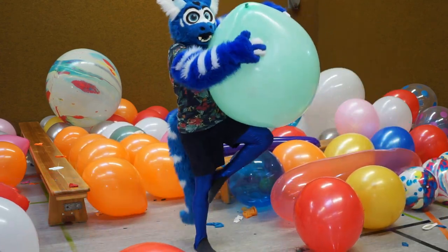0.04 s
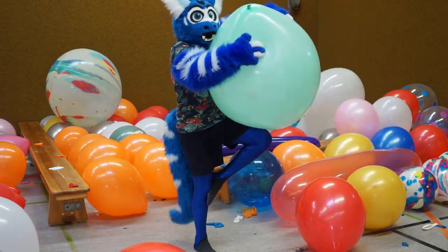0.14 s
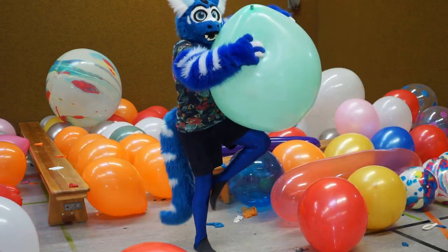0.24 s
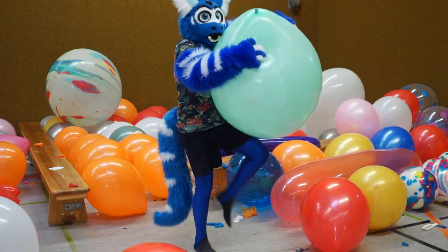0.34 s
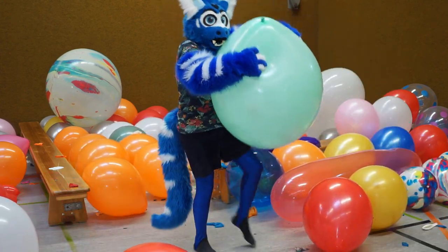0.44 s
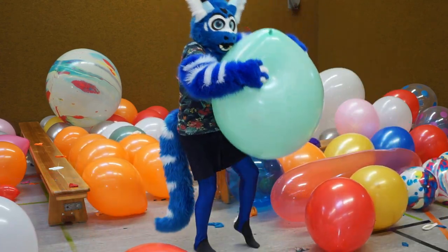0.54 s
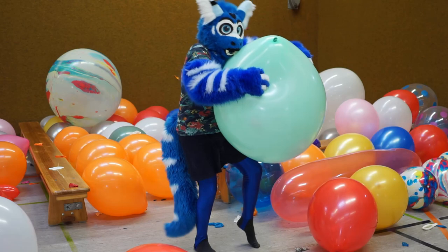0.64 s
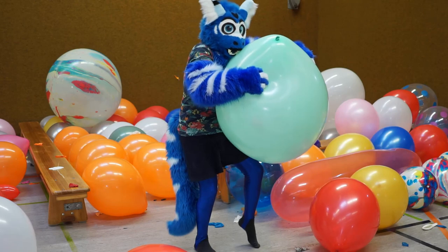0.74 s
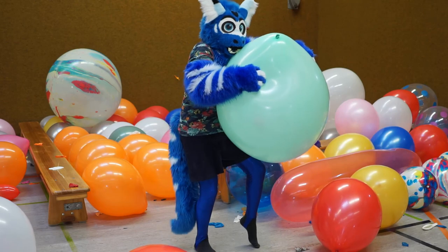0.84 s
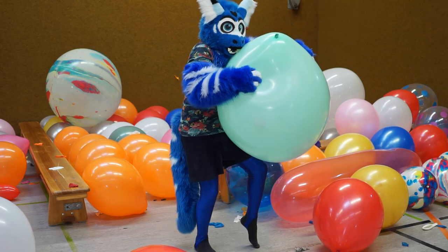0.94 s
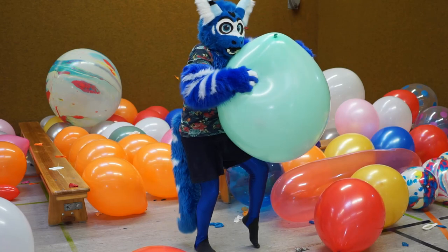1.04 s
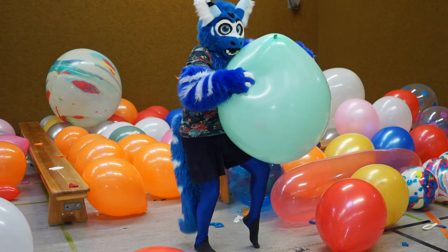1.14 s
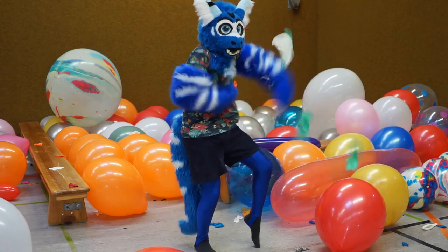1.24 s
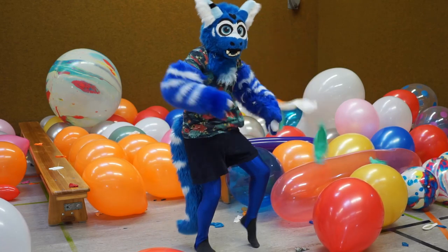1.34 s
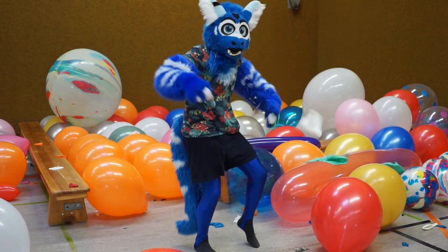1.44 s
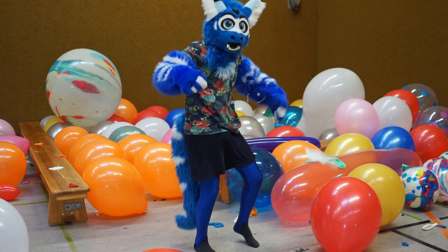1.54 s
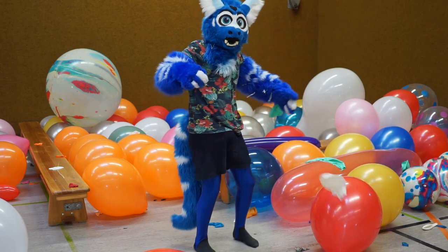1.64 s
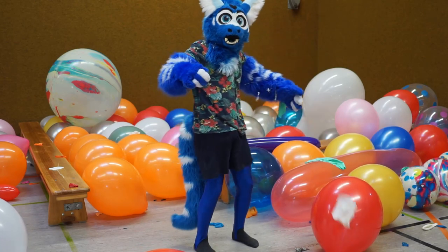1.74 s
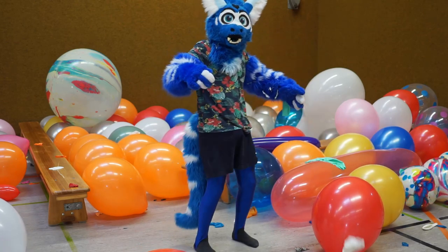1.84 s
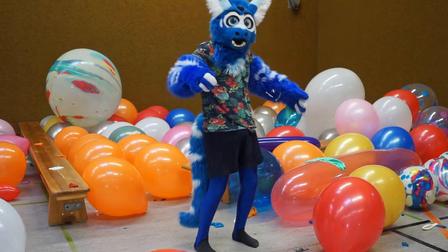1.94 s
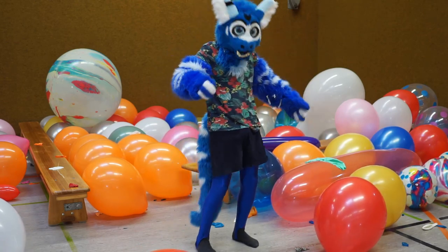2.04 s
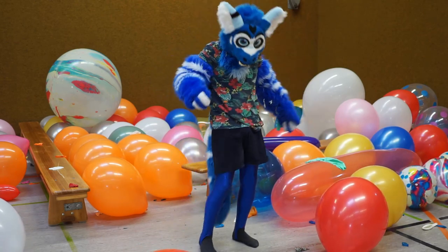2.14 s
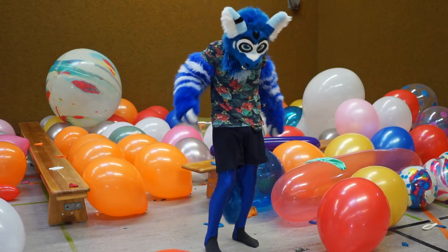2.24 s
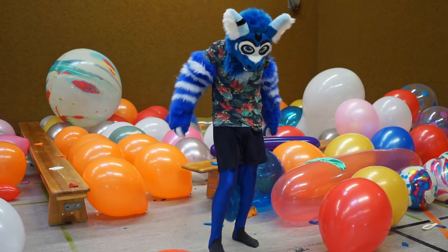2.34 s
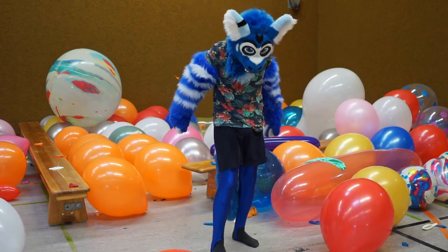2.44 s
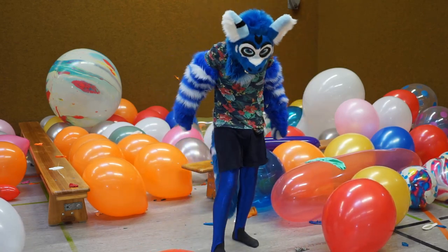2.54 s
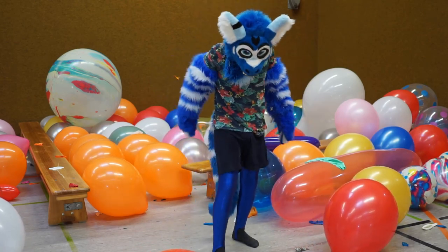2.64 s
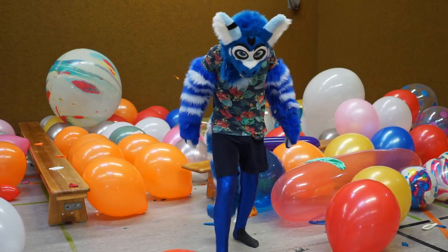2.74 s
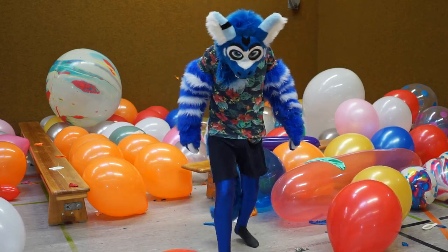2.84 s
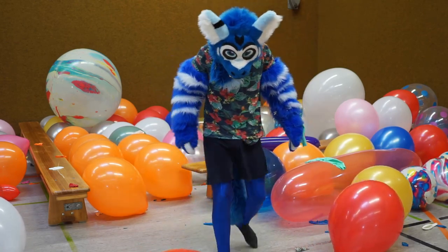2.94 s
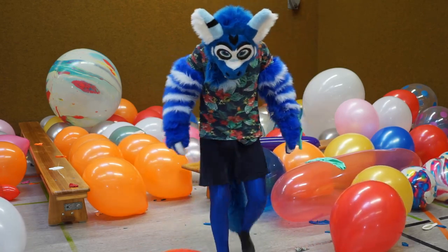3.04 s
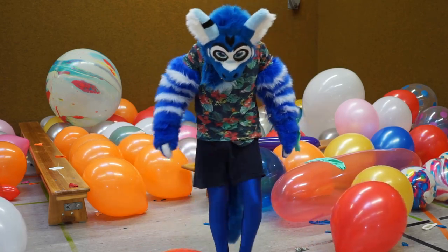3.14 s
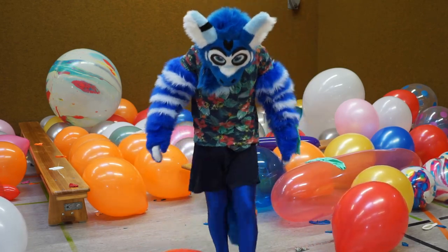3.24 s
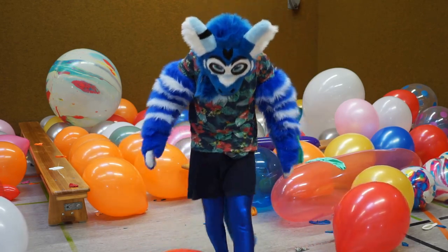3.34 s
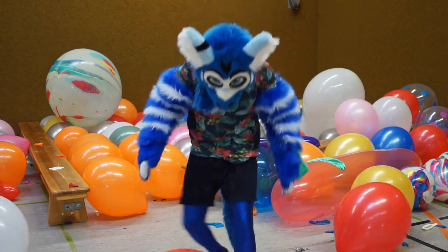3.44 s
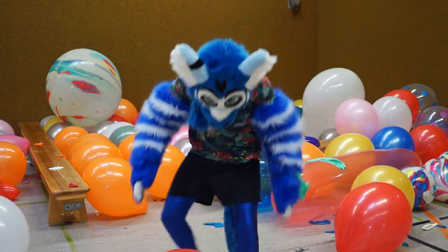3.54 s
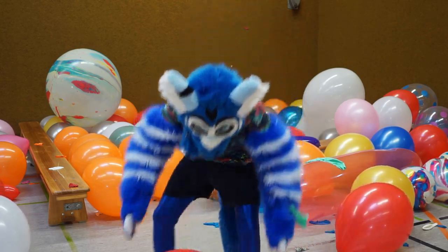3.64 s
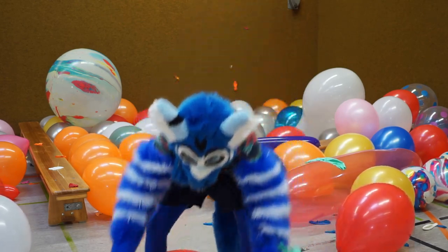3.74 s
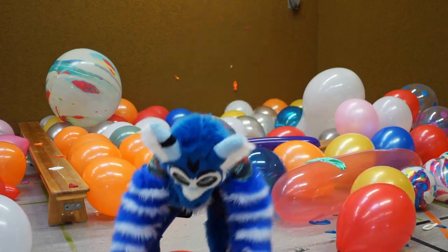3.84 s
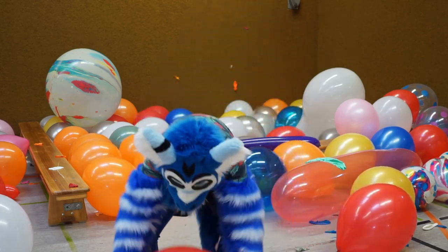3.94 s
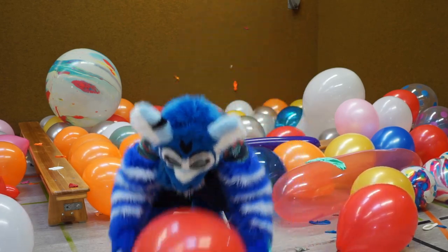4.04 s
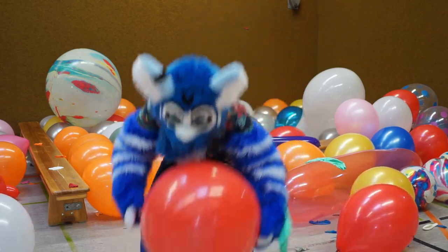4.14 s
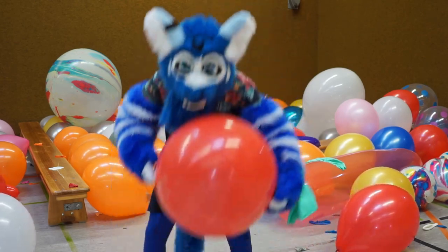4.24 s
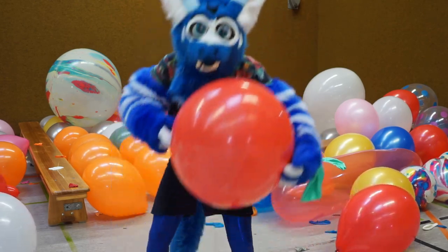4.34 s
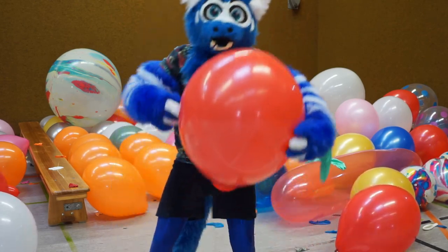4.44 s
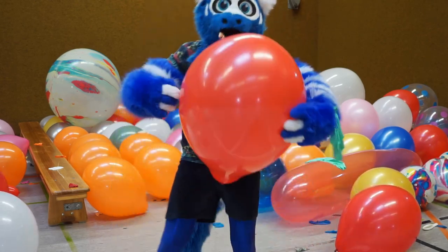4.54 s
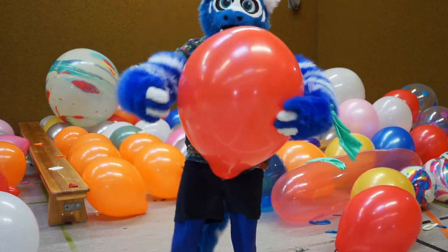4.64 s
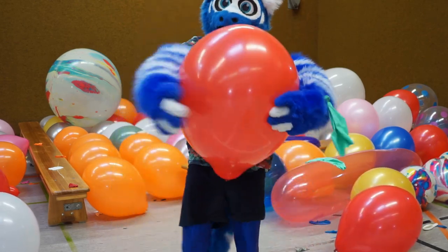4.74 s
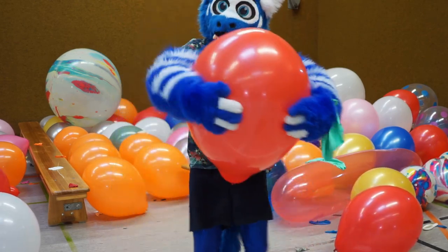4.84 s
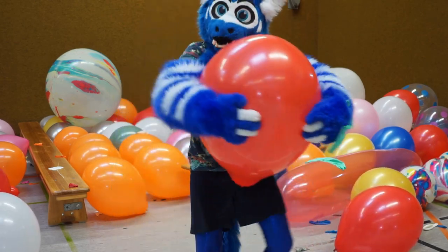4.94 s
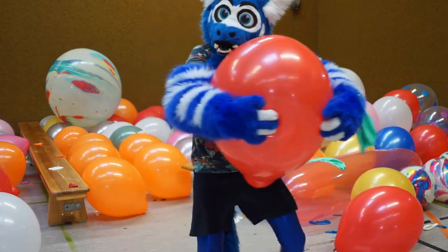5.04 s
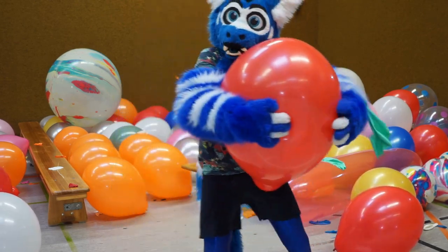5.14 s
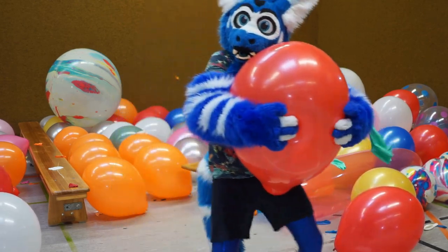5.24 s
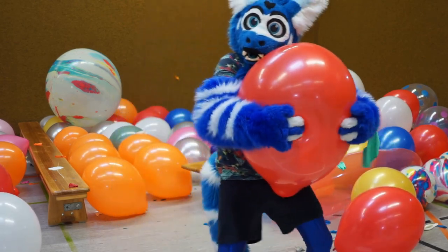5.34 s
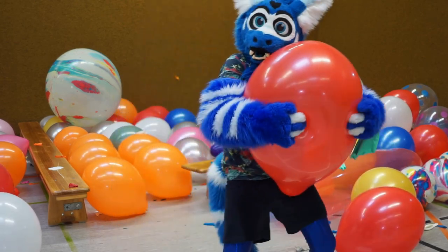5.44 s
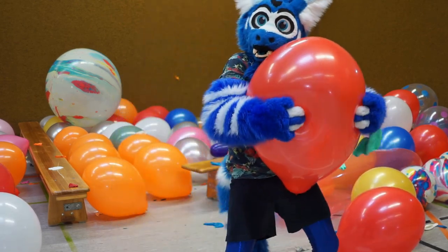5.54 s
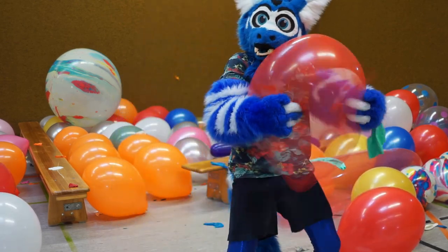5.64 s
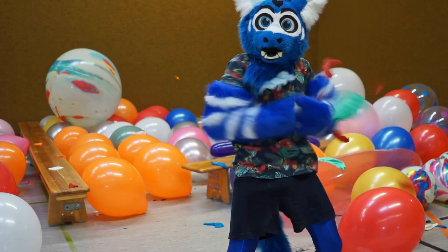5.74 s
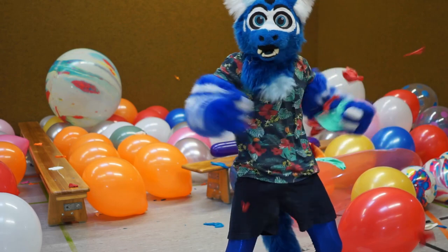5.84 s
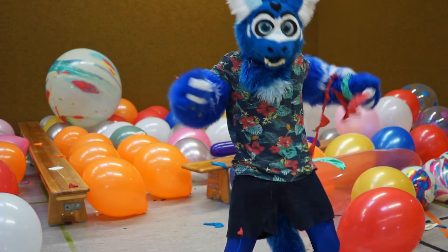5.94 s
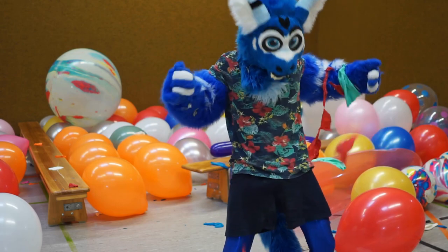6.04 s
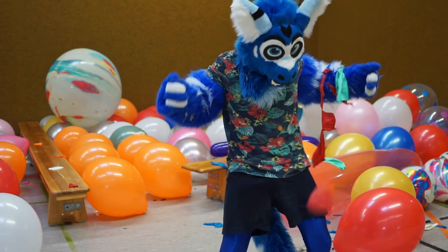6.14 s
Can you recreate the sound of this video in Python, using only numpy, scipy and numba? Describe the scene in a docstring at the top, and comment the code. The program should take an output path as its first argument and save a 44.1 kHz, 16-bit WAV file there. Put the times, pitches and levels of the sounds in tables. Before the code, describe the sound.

Quiet rubbing of fur on rubber tightens over about a second, then a loud burst with ripping latex fills a big hall with booming, repeating echoes. As they decay, dull steps and balloon bumps thud and one click snaps. Friction returns and grows until a second, shorter-tearing bang cuts in and its echo is left ringing. Peaks sound flattened and limited.

```python
"""Two big latex balloons burst in a sports hall: shock, ripping skin and an air push, then wall echoes,
a roar of decaying noise and a flutter echo between the end walls.
Someone in a furry costume hugs them until they burst: friction noise hisses and rasps, stick-slip squeaks.
Soft feet and bumps on the second balloon thud as damped low tones; small snaps ring briefly.
Over a faint room tone, saturation and a limiter flatten the peaks."""
import sys
import numpy as np
from scipy import signal
from scipy.fft import rfft, irfft, next_fast_len
from scipy.io import wavfile
from scipy.ndimage import map_coordinates
from numba import njit

SR = 44100
rng = np.random.default_rng(int(sys.argv[2]) if len(sys.argv) > 2 else 0)


def generate_wav(signal):
    """Clip the signal to [-1, 1] and save it as 16-bit WAV at the path in sys.argv[1]."""
    frames = np.transpose(np.atleast_2d(signal))
    scaled = np.clip(frames, -1, 1) * 32767
    pcm = np.round(scaled).astype(np.int16)
    wavfile.write(sys.argv[1], SR, pcm)


N = 273420
TIME = np.arange(N) / SR  # s

# the balloon bursts: burst t/s, bang level/dB, treble lift/dB, boom f/Hz, boom level/dB,
# shock and tear level/dB, tear t60/s, air push f/Hz, push level/dB, push delay t/s
BURSTS = [(1.213, 12.5, -2.5, 176, 10, 24.5, 0.12, 53.6, 7.5, 0.043),
          (5.6833, 8.5, 2, 247, 18, 14, 0.014, 105.6, 5.5, 0.0023)]


def amp(db):
    """Level definition: 20 dB make a factor of ten in amplitude."""
    return 10 ** (np.asarray(db) / 20)


def unit(x):
    """Normalisation by mean power: scale to rms 1."""
    return x / np.sqrt(np.mean(x ** 2) + 1e-20)


def along(points, hz):
    """Logarithmic frequency scale: interpolate (f/Hz, value) points along it."""
    f, v = np.transpose(points)
    return np.interp(np.log(hz + 1), np.log(f), v)


def filtered(x, response):
    """Linear filtering: multiply the spectrum by a response of frequency."""
    n = x.shape[-1]
    padded = next_fast_len(n + 8192)
    hz = np.fft.rfftfreq(padded, 1 / SR)
    return irfft(rfft(x, padded) * response(hz), padded)[..., :n]


def resonance(hz, centre, width):
    """Damped oscillator: the causal response of one resonance with peak gain 1."""
    return 1j * hz * width / (centre ** 2 - hz ** 2 + 1j * hz * width)


def colour(points):
    """Spectral envelope: the response given by (f/Hz, level/dB) points."""
    return lambda hz: amp(along(points, hz))


def noise(response, side_db, envelope=1):
    """Mid-side superposition: stereo noise of rms 1 before its envelope, shaped in time, then coloured."""
    mid, side = rng.standard_normal((2, N))
    side = amp(side_db) * side
    pair = unit(np.array([mid + side, mid - side]))
    power = np.abs(response(np.fft.rfftfreq(SR, 1 / SR))) ** 2
    return filtered(pair * envelope, response) / np.sqrt(np.mean(power))


def wobble(rate):
    """Random modulation: a smooth curve through normal random knots, rate knots a second."""
    knots = rng.standard_normal(int(N * rate / SR) + 4)
    return map_coordinates(knots, [TIME * rate])


def fade(t, t60):
    """Exponential decay: silent before t = 0, then dying by 60 dB in t60."""
    return (t >= 0) * np.exp(-np.log(1000) * np.abs(t) / t60)


def add(track, s, sound):
    """Superposition: mix a sound into the track from time s."""
    start = round(s * SR)
    part = sound[..., :N - start]
    track[:, start:start + part.shape[-1]] += part


def die_in_hall(x):
    """Frequency-dependent reverberation: each band decays with its own t60."""
    # reverberation of the hall: f/Hz, t60/s
    reverberation = [(50, 1.9), (110, 2.67), (220, 2.776), (600, 2.98), (1000, 2.25), (1600, 1.69),
                     (2300, 1.41), (4000, 1.195), (8000, 0.62), (15000, 0.43)]
    hz, t, bands = signal.stft(x, SR, nperseg=1024)
    decay = fade(t, along(reverberation, hz)[:, None])
    return signal.istft(bands * decay, SR, nperseg=1024)[1][:, :N]


def room_tone():
    """Stationary random noise: the steady background, coloured by a fixed spectrum."""
    # spectrum of the room tone: f/Hz, relative level/dB
    air = [(25, -10.5), (60, -6.5), (95, -1.5), (140, -14.5), (300, -16.5), (600, -22), (1200, -22.5),
           (3000, -35), (8000, -40), (16000, -42)]
    return amp(-44.5) * noise(colour(air), side_db=-5.0)


def reverberant(sent):
    """Convolution: every small sound excites a diffuse decaying noise tail of two seconds."""
    tail = die_in_hall(rng.standard_normal((2, N)))[:, :2 * SR]
    tail = tail / np.linalg.norm(tail[0])
    return signal.fftconvolve(sent, tail, axes=1)[:, :N]


def ticks():
    """Impulse excitation: short dry snaps join a dull click, one brief resonance and a little grit."""
    # small snaps: t/s, level/dB, f/Hz, bright grit level/dB
    snaps = [(2.716, -19, 2840, -32.5), (3.438, -27, 2100, -62.5), (3.4665, -3.5, 2260, -40.5),
             (3.487, -21, 2200, -64), (3.571, -28, 2300, -65.5), (3.606, -24, 2480, -37.5),
             (3.989, -21, 2150, -55), (4.001, -24, 2100, -57), (5.042, -33, 2800, -25)]
    attack = 0.00051  # s
    out, t = np.zeros((2, N)), TIME[:SR // 10]
    for s, db, hz, grit_db in snaps:
        rise = 1 - np.exp(-(t / attack) ** 2)
        ring = np.sin(2 * np.pi * hz * t) * fade(t, 0.0048)
        click = 0.33 * fade(t, 0.0012)
        click += 0.59 * rng.standard_normal(len(t)) * fade(t, 0.013)
        low_pass = signal.butter(4, min(1.35 * hz, SR / 4), fs=SR, output="sos")
        soft = signal.sosfilt(low_pass, (ring + click) * rise)
        grit = rng.standard_normal((2, len(t))) * fade(t, 0.016)
        add(out, s, amp(db) * soft + amp(grit_db) * grit)
    return out


def thuds():
    """Damped free vibration: a soft knock sets the sprung floor or the balloon swinging at one low pitch."""
    # footfalls and bumps on the balloon: t/s, swing level/dB, swing f/Hz, swing t60/s,
    # knock level/dB, knock f/Hz
    impacts = [(.514, -26.5, 62.7, 0.55, -49, 292), (2.843, -23.5, 51, .39, -60, 200),
               (3.425, -6.5, 59, 0.29, -43, 198), (3.752, -16, 69, .12, -69, 200),
               (3.801, -14.5, 58, .11, -73.5, 200), (3.90, -13, 51.7, 0.36, -47, 200),
               (3.925, -20.5, 109, 0.19, -44, 650), (3.955, -24, 174, .2, -51, 594),
               (4.282, -28, 109, 0.19, -55.5, 1070), (4.842, -22.5, 55, 0.58, -41, 182),
               (5.152, -13, 90.5, .16, -45.5, 208), (5.199, -9, 87.3, .14, -54.5, 600)]
    # spectrum of the soft contact: f/Hz, relative level/dB
    contact_spectrum = [(60, 9.5), (200, 7.5), (600, -3), (1200, -12.5), (3000, -9), (10000, -39)]
    pan_db = 2.5  # left over right
    pan = amp([[pan_db / 2], [-pan_db / 2]])
    channel_phase = np.array([[0.35], [-0.35]])  # rad
    out, t = np.zeros((2, N)), TIME[:SR]
    for s, db, hz, t60, knock_db, knock_hz in impacts:
        phase = 2 * np.pi * hz * t + 0.78 * wobble(35)[:SR] + channel_phase
        swing = np.sin(phase) * fade(t, t60) * (1 - np.exp(-(t / 0.0057) ** 2))
        contact = rng.standard_normal(SR) * fade(t, 0.052) * (1 - np.exp(-(t / 0.0049) ** 2))
        body = lambda f: colour(contact_spectrum)(f) * resonance(f, knock_hz, 0.28 * knock_hz)
        knock = unit(filtered(contact, body))
        add(out, s, (amp(db) * swing + amp(knock_db) * knock) * pan)
    return out


def squeaks():
    """Stick-slip oscillation: under the hardest squeeze the rubber sounds two harmonics of a wavering pitch."""
    # squeaks: t/s, length t/s, mean f/Hz, level/dB
    slips = [(0.667, .025, 4570, -41.5), (1.002, 0.028, 1135, -26.5), (1.027, .025, 924, -33),
             (1.068, 0.023, 1064, -29.5)]
    out = np.zeros(N)
    for s, length, hz, db in slips:
        phase = 2 * np.pi * np.cumsum(hz * (1 + 0.04 * wobble(200))) / SR
        swell = np.sin(np.pi * np.clip((TIME - s) / length, 0, 1))
        out += amp(db) * swell * (np.sin(phase) + 0.14 * np.sin(2 * phase))
    return out


def rubbing():
    """Friction noise: fur slipping over taut latex hisses and rasps, more as the hug tightens or strokes."""
    # hugs tightening until the burst: start t/s, hiss level/dB at first, hiss level/dB at the burst,
    # skin level/dB at first, skin level/dB at the burst, power of the rise
    hugs = [(0.0, -49.5, -38.5, -54.5, -35.5, 1.17), (3.89, -50.5, -33.5, -49, -38.5, 2.4)]
    # strokes as the arms shift their grip: middle t/s, half width t/s, hiss level/dB, skin level/dB
    strokes = [(.07, .03, -51, -52), (.212, 0.028, -49.5, -47), (.39, .035, -46, -47.5),
               (.48, 0.047, -43.5, -47), (0.684, 0.027, -39, -43.5), (.785, 0.045, -40.5, -42.5),
               (.94, 0.11, -42, -37.5), (1.11, 0.057, -41, -35.5), (1.99, .05, -51.5, -78.5),
               (2.63, 0.041, -56, -54.5), (2.75, .055, -55, -46), (3.927, .028, -43, -31.5),
               (3.99, 0.043, -57, -43), (4.311, 0.049, -42, -46), (4.43, 0.058, -44.5, -54),
               (4.56, .03, -46, -46.5), (4.751, 0.048, -42, -39), (4.854, 0.0081, -44, -34),
               (4.895, 0.087, -39, -38), (5.025, .07, -37.5, -40), (5.202, .004, -47, -39),
               (5.41, 0.054, -34, -40), (5.52, 0.064, -32, -34.5)]
    # hiss of the fur on the first and second balloon: f/Hz, relative level/dB
    hiss_first = [(2350, -18), (4000, -4.5), (5800, -8), (6470, -6), (8400, 1), (9830, 0.5), (11100, -2.5),
                  (16000, -18)]
    hiss_second = [(2350, -23), (4000, -7), (5760, -6.5), (8600, -1), (11100, -4.5), (13800, -8.5),
                   (16000, -21.5)]
    # rasp of the first and second skin: f/Hz, relative level/dB
    skin_first = [(100, -11.5), (200, 0), (400, -9.5), (650, -3), (1050, -1.5), (1500, -7), (3000, -6.5),
                  (6000, -19), (10000, -35)]
    skin_second = [(100, 0.5), (200, 2.5), (350, -8), (640, 1), (900, -5), (1280, -1.5), (1700, -4.5),
                   (4000, -9), (6000, -20), (10000, -36.5)]
    grip_time = 0.032  # s, the fur settles on the rubber just ahead of the hug
    spectra = [(hiss_first, skin_first), (hiss_second, skin_second)]
    out, last_burst = np.zeros((2, N)), -np.inf
    for hug, (hiss_spectrum, skin_spectrum), (burst, *_) in zip(hugs, spectra, BURSTS):
        start, hiss_from, hiss_to, skin_from, skin_to, power = hug
        squeeze = np.clip((TIME - start) / (burst - start), 0, 1) ** power
        touching = np.clip((TIME - start) / grip_time + 1, 0, 1) * (TIME < burst)
        hiss_power = (touching * amp(hiss_from + (hiss_to - hiss_from) * squeeze)) ** 2
        skin_power = (touching * amp(skin_from + (skin_to - skin_from) * squeeze)) ** 2
        for s, width, hiss_db, skin_db in strokes:
            if last_burst < s < burst:
                stroke = np.exp(-((TIME - s) / width) ** 2)
                hiss_power += (amp(hiss_db) * stroke) ** 2
                skin_power += (amp(skin_db) * stroke) ** 2
        hiss = noise(colour(hiss_spectrum), side_db=-7)
        jerks = amp(1.3 * wobble(300))  # the grip slips in jerks
        skin = noise(colour(skin_spectrum), side_db=-21, envelope=jerks)
        both = np.sqrt(hiss_power) * hiss + np.sqrt(skin_power) * skin
        out += amp(0.9 * wobble(50)) * both
        last_burst = burst
    return out


def flutter(round_trip, t60, sharp_t60, scatter_db, scatter_t60):
    """Flutter echo: the bang runs between the end walls, each sharp return with scatter behind it."""
    # spectrum of the returns: f/Hz, relative level/dB
    spectrum = [(100, -21.5), (220, -11), (400, -5), (580, 7), (750, -7), (1000, -9), (1500, -36),
                (4000, -65)]
    since = TIME % round_trip
    each_return = fade(since, sharp_t60) + amp(scatter_db) * fade(since, scatter_t60)
    returns = (TIME > round_trip) * each_return
    return noise(colour(spectrum), side_db=-18.5, envelope=returns * fade(TIME, t60))


def hall_roar(bang_db, lift_db, boom_hz, boom_db, round_trip):
    """Diffuse reverberation: a coloured bang and a resonant boom build up and die in the hall."""
    # spectrum of the bang: f/Hz, relative level/dB
    spectrum = [(30, -32.5), (60, -27), (100, 11), (250, 1), (550, -2), (1000, 2), (1600, 1.5), (2300, -3),
                (3300, -2.5), (4500, -7), (8000, -11), (16000, -21.5)]
    boom = noise(lambda hz: resonance(hz, boom_hz, 0.82 * boom_hz) ** 2, side_db=-6.5)
    # clusters of echoes come back from the far end, weaker at each round trip
    off_centre = (TIME - 0.145 + round_trip / 2) % round_trip - round_trip / 2
    surge_db = 4 * np.exp(-(off_centre / 0.035) ** 2) * fade(TIME, 4.5)
    coarse_db = 0.7 * wobble(35.08) + 1.05 * wobble(400)  # single strong reflections
    lift = lambda hz: amp(lift_db * hz / (hz + 1500))
    bang = noise(colour(spectrum), side_db=-6.5, envelope=amp(surge_db + coarse_db))
    bang = filtered(bang, lift)
    build_up = 1 / (1 + np.exp((0.062 - TIME) / 0.0087))  # far walls answer late
    roar = die_in_hall(amp(bang_db) * bang + amp(boom_db) * boom)
    return roar * build_up * amp(2.34 * wobble(22.27))


def near_blast(bang_db, tear_db, tear_t60, push_hz, push_db, push_delay):
    """Pressure release: a shock, ripping skin and the bounce of freed air, thrown back by near walls."""
    # spectrum of the tearing rubber: f/Hz, relative level/dB
    tear_spectrum = [(60, -12), (170, 6), (400, 1), (1100, -2), (2000, -9.5), (5000, -18), (16000, -26)]
    # first reflections: delay t/s, mean level/dB
    reflections = [(.006, -4), (0.023, -0.5), (0.028, -6.5), (.035, 0.5), (0.038, -4)]
    out, u = np.zeros((2, N)), TIME / 0.0012
    shock = (1 - u) * np.exp(-u)
    since_push = TIME - push_delay
    push = amp(push_db) * np.sin(2 * np.pi * push_hz * since_push) * fade(since_push, 0.076)
    out += amp(tear_db) * shock + push
    tear = noise(colour(tear_spectrum), side_db=-5.5) * fade(TIME, tear_t60)
    add(out, 0.0008, amp(tear_db) * tear)
    for delay, db in reflections:
        crack = shock + 0.47 * rng.standard_normal((2, N)) * np.exp(-u)
        wall_gain = amp(db + rng.normal(0, 5.2, (2, 1)))  # scattered separately left and right
        add(out, delay, wall_gain * (amp(bang_db) * crack + amp(-5.5) * push))
    return out


def bursts():
    """Direct and reflected sound: each burst sums its blast, the roar of the hall and its flutter echo."""
    out = np.zeros((2, N))
    round_trip = 0.2085  # s, to and fro between the end walls
    for s, bang_db, lift_db, boom_hz, boom_db, tear_db, tear_t60, push_hz, push_db, push_delay in BURSTS:
        add(out, s, near_blast(bang_db, tear_db, tear_t60, push_hz, push_db, push_delay))
        add(out, s, hall_roar(bang_db, lift_db, boom_hz, boom_db, round_trip))
        echo = flutter(round_trip, t60=4.38, sharp_t60=0.025, scatter_db=-9.5, scatter_t60=0.63)
        add(out, s, amp(2.5) * echo)
    return out


def scene():
    """Superposition: small sounds with their share of the hall, the bursts, and the room tone."""
    rubber, bumps, snaps = rubbing() + squeaks(), thuds(), ticks()
    sent = amp(-17.5) * rubber + amp(-21.5) * bumps + amp(-20) * snaps
    return rubber + bumps + snaps + reverberant(sent) + bursts() + room_tone()


@njit
def follow(level, attack, release):
    """Envelope detection: a peak follower rises fast and sinks slowly, by time constants in seconds."""
    out, held = np.empty_like(level), 0.0
    for i in range(len(level)):
        held += (level[i] - held) / (SR * (attack if level[i] > held else release))
        out[i] = held
    return out


def overload(x, top_db, hardness):
    """Saturation: peaks flatten against a ceiling."""
    return x / (1 + np.abs(x / amp(top_db)) ** hardness) ** (1 / hardness)


def microphone(hz):
    """Frequency response: a dip in the low mids and a second-order bass roll-off."""
    low_cut = 39  # Hz
    dip = 1 - 0.67 * resonance(hz, 411.0, 135)
    roll_off = (1j * hz / low_cut) * resonance(hz, low_cut, 1.3 * low_cut) / 1.304
    return dip * roll_off


def record(dry):
    """Nonlinear gain: the input saturates, a limiter pulls it down, then the response colours it."""
    hot = overload(dry, top_db=9.5, hardness=1.9)
    held = follow(np.abs(hot).max(axis=0), 0.0012, 0.11)
    limited = overload(hot / np.maximum(1, held / amp(-3.0)), top_db=-2.5, hardness=11)
    coloured = filtered(limited, microphone)
    return filtered(coloured, lambda hz: hz < 15900)  # nothing above this frequency in Hz


dry = scene()
out = record(dry)
generate_wav(out)
```